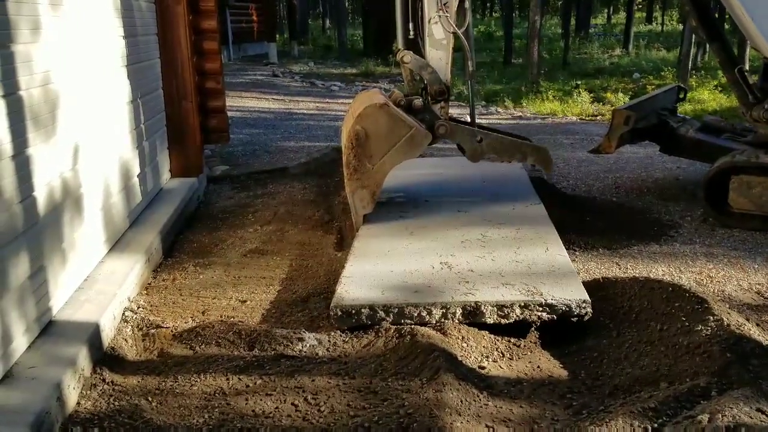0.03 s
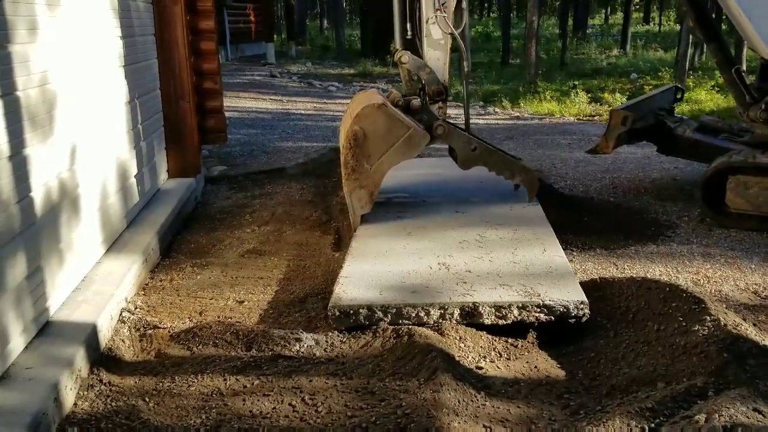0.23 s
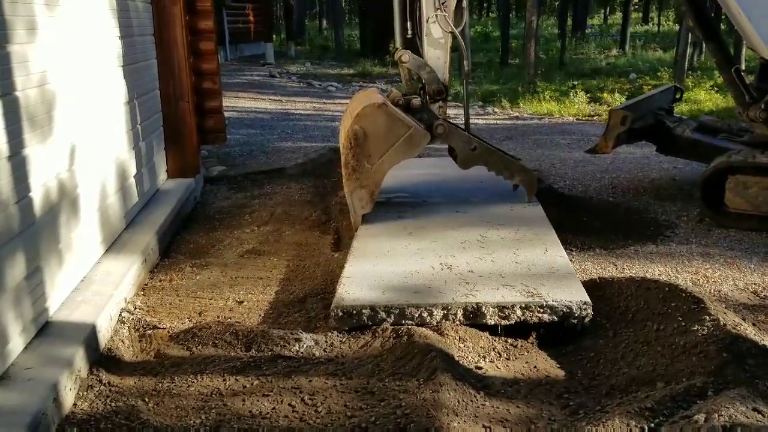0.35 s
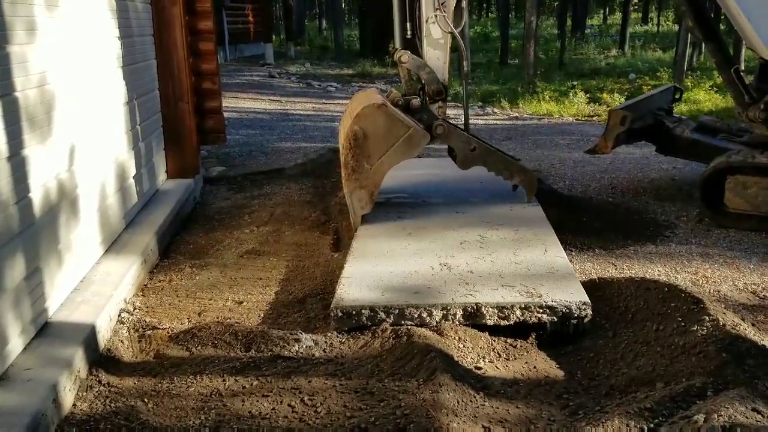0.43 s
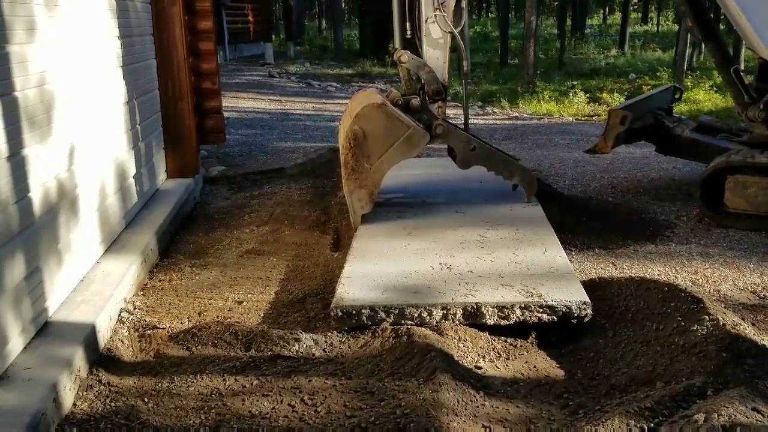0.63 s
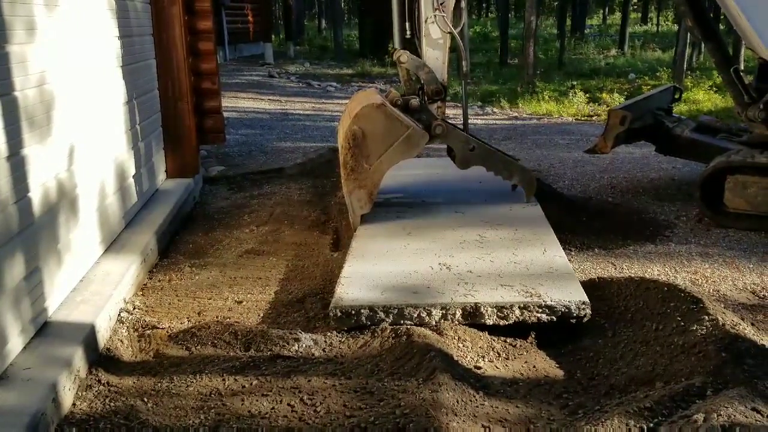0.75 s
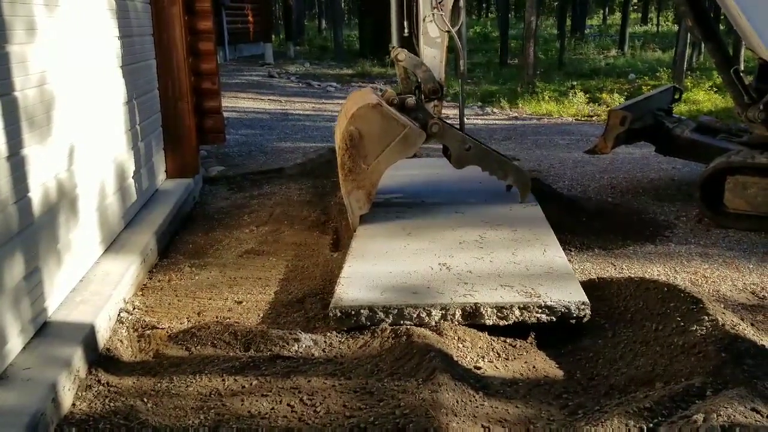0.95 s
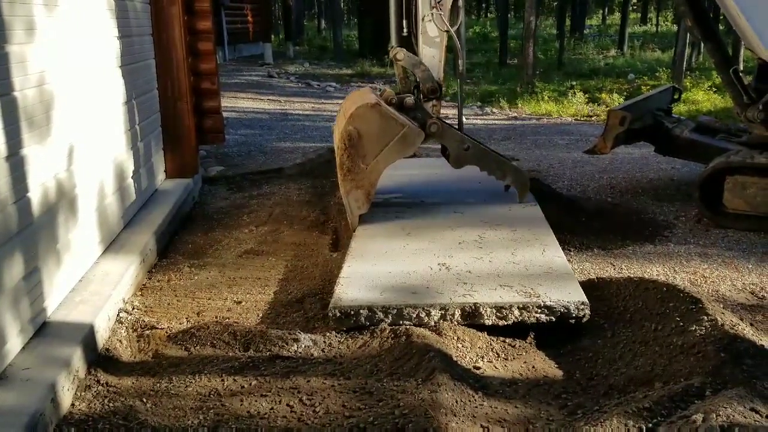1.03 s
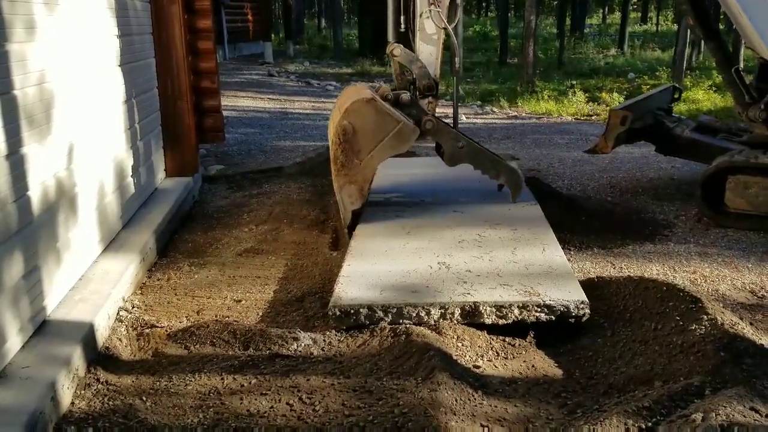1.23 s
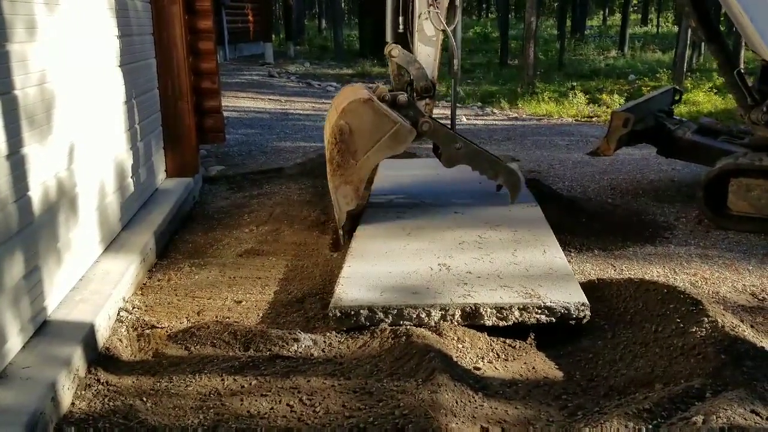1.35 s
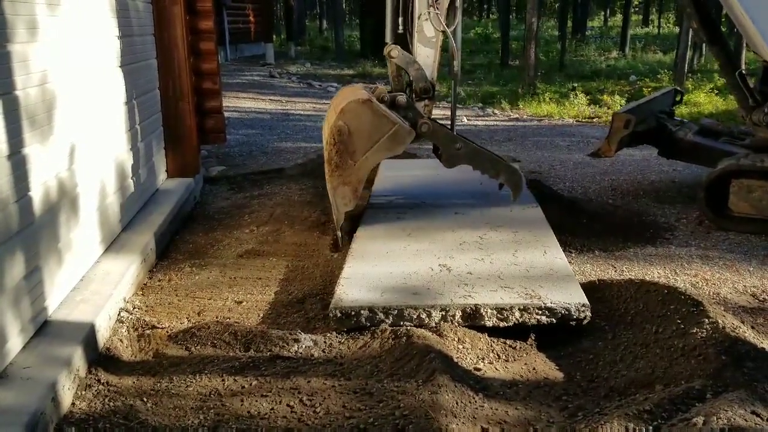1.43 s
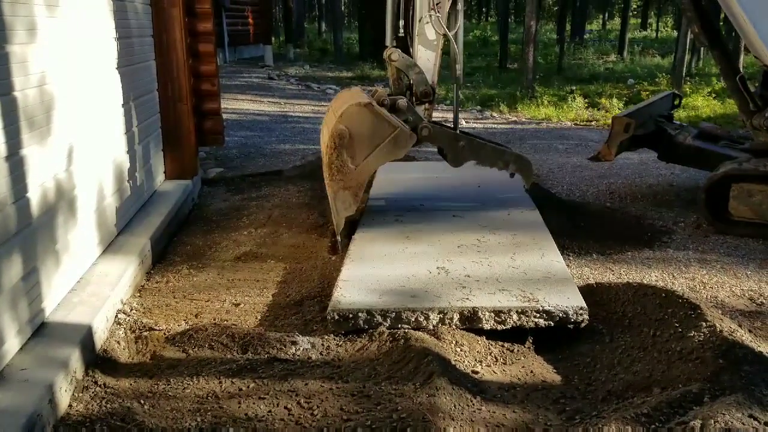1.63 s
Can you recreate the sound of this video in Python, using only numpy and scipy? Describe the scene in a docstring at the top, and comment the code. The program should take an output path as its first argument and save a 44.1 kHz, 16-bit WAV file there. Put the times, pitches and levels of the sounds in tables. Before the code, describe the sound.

One heavy, gritty thud sounds as a digger bucket strikes concrete in a yard. A brief hydraulic whine drops away and the diesel keeps rumbling under a small bright snap and a few light, hollow knocks and scrapes.

```python
"""Small excavator knocking concrete

Outdoors beside a wall, a diesel engine labours and its hydraulic pump whines until the steel
bucket hits a broken slab with a heavy thud. Then the engine runs free, a chip of concrete
snaps, and the bucket knocks and scrapes lightly along the slab's edge."""
import sys
import numpy as np
from scipy import signal
from scipy.fft import rfft, irfft
from scipy.io import wavfile

SR = 44100
rng = np.random.default_rng(int(sys.argv[2]) if len(sys.argv) > 2 else 0)


def master_out(mix):
    """Clip the mix to full scale and print it as 16-bit PCM to the path in sys.argv[1]."""
    frames = np.transpose(np.atleast_2d(mix))
    ceiling = np.clip(frames, -1, 1)
    pcm = np.round(ceiling * 32767).astype(np.int16)
    wavfile.write(sys.argv[1], SR, pcm)


N = 74970
TIME = np.arange(N) / SR

# Engine speed. Each row: time in seconds, crankshaft turns per second.
SPEED = [(0, 34.2), (.3, 34.0), (.45, 35.9), (.77, 36.5), (1.2, 35.8), (1.35, 36.1), (1.7, 34.9)]
# How hard the engine works. Each row: time in seconds, level change in dB.
EFFORT = [(0, 3), (.27, 4.5), (.5, 1), (.85, 0), (1.0, 2), (1.28, -0.5), (1.45, 2.5), (1.7, 5)]
# Engine and pump tones. Each row: cycles per crankshaft turn, level in dB.
DIESEL_TONES = [(2, -44.5), (4, -42), (5, -44), (6, -41.5), (7, -49.5), (9, -51.5)]
PUMP_TONES = [(9, -37), (18, -43)]

# The thud's blows. Each row: start in seconds, levels of slab, bucket, crunch and edge in dB,
# rise time in seconds.
BLOWS = [(0.2835, -7.5, -23.5, -19.5, -20.5, 0.0034), (.297, -6, -12, -24.5, -38, 0.0059),
         (.311, -8.5, -15.5, -18, -30.5, 0.0036), (.320, -40, -7, -31, -34, 0.0022),
         (.337, -19, -18, -30.5, -41, 0.0044), (.364, -35, -17, -44, -32.5, 0.0025),
         (.407, -36, -30, -37.5, -39, 0.0011)]
# Light knocks. Each row: start in seconds, levels of body, scrape and edge in dB,
# rise and fade times in seconds. A fade time is how long a sound takes to drop 60 dB.
KNOCKS = [(.968, -30.5, -42.5, -60, 0.029, 0.28), (1.035, -35, -35.5, -42, 0.017, 0.26),
          (1.219, -34, -39.5, -58, 0.019, 0.17), (1.3444, -23.5, -33, -35, 0.00073, 0.15),
          (1.396, -25, -31.5, -42, 0.0023, 0.13), (1.418, -29, -41, -39, 0.0022, 0.33),
          (1.441, -33, -33, -36.5, 0.0023, 0.19), (1.457, -30, -30, -23, 0.0058, 0.2),
          (1.546, -32, -26, -35, 0.0019, 0.12), (1.598, -32.5, -51, -56, 0.0036, 0.089),
          (1.676, -32.5, -39, -35, 0.0064, 0.14)]
# Snapping chips. Each row: start in seconds, level in dB.
CHIPS = [(0.8596, -33), (0.864, -32.5), (0.964, -47.5), (1.054, -40.5)]

# The tone colour of each noise. Each row: frequency in Hz, relative level in dB.
RUMBLE_NOISE = [(25, -28), (50, -12), (65, -36), (90, -6), (115, -15.5), (145, -2.5), (180, -1.5),
                (240, -4.5), (300, -9), (400, -12), (560, -16.5), (750, -13.5), (1000, -23), (1600, -34.5),
                (4000, -50.5)]
AIR_NOISE = [(500, -4), (1300, 5), (2000, 1), (3000, 1.5), (3700, -6.5), (5500, -8), (7400, -9.5),
             (8400, -23), (12000, -18.5), (15500, -27)]  # valve gear and fan air
OIL_NOISE = [(100, -4), (350, -54), (750, 6), (1100, -3), (2800, -12.5), (4500, -19.5), (7200, -13.5),
             (8500, -29), (15000, -29.5)]
CHIP_NOISE = [(1000, -12), (2600, -4), (4400, -4), (6300, -1.5), (8300, -9), (15500, -12.5)]
KNOCK_NOISE = [(100, -8), (350, -1), (520, -11.5), (720, -1), (920, -9.5), (1200, -11.5), (3000, -35),
               (8000, -54)]
SCRAPE_NOISE = [(400, -7), (1200, 1.5), (1800, -1), (2400, 3.5), (3400, -4.5), (6500, -13), (8700, -24),
                (15000, -31)]
THUD_NOISE = [(50, -25), (90, -5), (250, 2.5), (650, 0.5), (1000, -9), (1600, -13.5), (4000, -37.5)]
CRUNCH_NOISE = [(200, -22), (800, 4.5), (1900, -5), (3000, -2.5), (4500, -8.5), (7200, -13), (8700, -23),
                (15000, -29.5)]
CRACK_NOISE = [(900, -20), (1500, -18), (1800, 8), (2050, 5), (2400, -8), (2900, -19), (6000, -19),
               (12000, -37)]  # first bite of the steel edge

# The notes struck things ring with. Each row: pitch in Hz, relative level in dB, fade time in seconds.
CHIP_NOTES = [(2960, -18, .15), (3190, -4, 0.054), (4398, -3.5, 0.051), (4610, -10.5, 0.076),
              (6200, -2, 0.047), (6480, -11, 0.065), (9400, -16, .06), (11740, -14, .06), (11950, -14, .07),
              (13125, -9, 0.066)]
SLAB_NOTES = [(51.6, -14.5, 0.44), (98.3, -7, 0.31), (207.3, -11, 0.18), (252, 4, 0.15), (530, -4.5, 0.2),
              (549.2, -5.5, 0.16)]
BUCKET_NOTES = [(310.6, -5.5, 0.21), (369.2, -5, 0.27), (433, -1.5, 0.12), (645.6, 4.5, 0.12),
                (695, -5, 0.077), (743, -8, 0.15), (817.5, -9.5, 0.36), (886.6, -6, 0.2),
                (1084, -5.5, 0.13), (1129, -4, 0.092), (1302, -10, 0.08), (1531, -17.5, .15)]
EDGE_NOTES = [(1674, -3.5, 0.19), (1787, -1, 0.071), (1863, -3, 0.082), (1981, -6, 0.14), (2200, -5, 0.1),
              (2484, -8.5, .08), (2640, -9, 0.13)]  # steel cutting edge
HOLLOW_NOTES = [(721, 1, 0.14), (764, -3, .08)]  # air inside the bucket

# Stereo width. Each row: frequency in Hz, dB by which the ears' difference exceeds what they share.
ENGINE_WIDTH = [(60, -10), (150, -14), (380, -5.5), (950, 4), (2380, -1), (5980, 0.5), (15000, 1)]
HIT_WIDTH = [(60, -22), (250, -20), (550, -6), (750, -19.5), (1050, 3), (2000, -0.5), (12000, -1)]
# Where the hits sit. Each row: frequency in Hz, left level minus right level in dB.
HIT_PAN = [(500, 0.5), (1100, 0), (2300, -0.5), (4400, -4.5), (8000, -0.5), (13000, 4.5)]


def amp(db):
    """Turns decibels into a multiplier."""
    return 10 ** (np.asarray(db) / 20)


def unit(x):
    """Scales a signal to an average power of 1."""
    return x / np.sqrt(np.mean(x ** 2) + 1e-20)


def by_hz(points, hz):
    """Reads a table between its rows, spacing frequencies by octaves."""
    row_hz, value = np.transpose(points)
    return np.interp(np.log(hz + 1), np.log(row_hz + 1), value)


def by_time(points):
    """Reads a table at every sample."""
    return np.interp(TIME, *np.transpose(points))


def add(mix, start, sound):
    """Mixes in a stereo sound at a start time in seconds."""
    part = mix[:, round(start * SR):][:, :sound.shape[1]]
    part += sound[:, :part.shape[1]]


def drift(rate_hz):
    """A smooth random wander, mostly slower than the given rate."""
    hz = np.fft.rfftfreq(N, 1 / SR)
    return unit(irfft(rfft(rng.standard_normal(N)) / (1 + (hz / rate_hz) ** 4), N))


def coloured(noises, colour, width=HIT_WIDTH):
    """Gives two noises a tone colour and a stereo width; both ears share most of the bass."""
    hz = np.fft.rfftfreq(noises.shape[1], 1 / SR)
    angle = np.arctan(amp(by_hz(width, hz)))
    mid, side = rfft(noises) * np.array([np.cos(angle), np.sin(angle)]) * amp(by_hz(colour, hz))
    return unit(irfft(np.array([mid + side, mid - side]), noises.shape[1]))


def burst(colour, rise, fade, grit_db=0, size=22050):
    """Noise that swells and dies away; grit makes its level jump every 16 samples."""
    t = np.arange(size) / SR
    noise = rng.standard_normal((2, size))
    grains = np.repeat(amp(grit_db * rng.standard_normal(size)), 16)[:size]
    envelope = np.minimum(t / rise, 1) * amp(-60 * np.maximum(t - rise, 0) / fade)
    return coloured(noise * grains, colour) * envelope


def ring(notes, rise, phase_spread=np.pi, size=22050):
    """Fading notes, struck a little differently each time; high ones differ between the ears."""
    t = np.arange(size) / SR
    out = np.zeros((2, size))
    for (hz, db, fade), (extra_db, phase) in zip(notes, rng.standard_normal((len(notes), 2))):
        ear_phase = np.array([[1], [-1]]) * np.arctan(amp(by_hz(HIT_WIDTH, hz)))
        wave = np.sin(2 * np.pi * hz * t + phase_spread * phase + ear_phase)
        out += amp(db + extra_db - 60 * t / fade) * wave
    return out * np.minimum(t / rise, 1)


def shaft_tone(turns, per_turn, db):
    """A tone that follows the crankshaft and wavers a little in level."""
    level = np.sqrt(2) * amp(db + 1.3 * drift(rate_hz=5))
    return level * np.sin(2 * np.pi * (per_turn * turns + rng.random()))


def yard_echoes(sound, fade=0.33, size=22050):
    """Thin, scattered echoes from wall, machine and trees."""
    t = np.arange(size) / SR
    echoes = rng.standard_normal((2, size))
    echoes *= rng.random((2, size)) < 2000 / SR  # about 2000 a second
    echoes *= (t > .012) * amp(-60 * t / fade)
    tail = coloured(echoes, [(100, 1), (7000, 6.5), (15000, 0)]) / np.sqrt(size)
    return signal.fftconvolve(sound, tail, axes=1)[:, :N]


def engine(turns):
    """The diesel hums and its rumble pulses with each firing; valve gear and fan air hiss."""
    effort_db = by_time(EFFORT)
    firing = 1 + 0.26 * np.cos(2 * np.pi * 2 * turns)  # twice a turn
    rumble = amp(-34.5) * coloured(rng.standard_normal((2, N)) * firing, RUMBLE_NOISE, ENGINE_WIDTH)
    hiss_db = -45 + 0.71 * effort_db + 0.59 * drift(rate_hz=40)
    hiss = amp(hiss_db) * coloured(rng.standard_normal((2, N)), AIR_NOISE, ENGINE_WIDTH)
    hum = sum(shaft_tone(turns, per_turn, db) for per_turn, db in DIESEL_TONES)
    fan = shaft_tone(turns, per_turn=7.33, db=-37)
    return (rumble + hum + fan) * amp(effort_db) + hiss


def hydraulic_pump(turns, flutter_hz=16, release_s=0.36, release_length_s=0.15):
    """The pump's fluttering whine and the hiss of its oil stop as the load drops."""
    pump_turns = turns + .003 * drift(flutter_hz)
    whine = sum(shaft_tone(pump_turns, per_turn, db + 1.8 * drift(flutter_hz))
                for per_turn, db in PUMP_TONES)
    oil = amp(-38) * coloured(rng.standard_normal((2, N)), OIL_NOISE, ENGINE_WIDTH)
    load = np.clip(1 - (TIME - release_s) / release_length_s, 0, 1)
    return load * (whine + oil)


def chips(rise=0.00096):
    """Concrete breaks with bright, pinging snaps."""
    out = np.zeros((2, N))
    for start, db in CHIPS:
        snap = amp(-0.5) * burst(CHIP_NOISE, rise, fade=0.086, grit_db=-0.5)
        add(out, start, amp(db) * (snap + ring(CHIP_NOTES, rise)))
    return out


def knocks():
    """Steel touches concrete lightly: a hollow knock and a gritty scrape that rings the edge."""
    out = np.zeros((2, N))
    for start, body_db, scrape_db, edge_db, rise, fade in KNOCKS:
        hollow = amp(-6.5) * ring(HOLLOW_NOTES, rise + .003)
        body = burst(KNOCK_NOISE, rise, fade) + hollow + amp(-10) * ring(BUCKET_NOTES, rise)
        scrape = amp(scrape_db) * burst(SCRAPE_NOISE, rise, fade, grit_db=3.5)
        edge = amp(edge_db) * ring(EDGE_NOTES, rise)
        add(out, start, amp(body_db) * body + scrape + edge)
    return out


def thud(settle_s=.374, settle_db=-6):
    """The bucket cracks onto the slab and chatters, crushing grit; settling damps the ringing."""
    body, bite = np.zeros((2, 2, N))
    for start, slab_db, bucket_db, crunch_db, edge_db, rise in BLOWS:
        slab = amp(slab_db) * ring(SLAB_NOTES, rise, phase_spread=0.094)
        bucket = 0.64 * ring(BUCKET_NOTES, rise, phase_spread=0.98)
        thump = amp(-4.5) * burst(THUD_NOISE, rise, fade=0.14)
        add(body, start, slab + amp(bucket_db) * (bucket + thump))
        crunch = amp(crunch_db) * burst(CRUNCH_NOISE, rise, fade=0.13, grit_db=-0.5)
        clank = amp(edge_db) * ring(EDGE_NOTES, rise)
        add(bite, start + .002, crunch + clank)
    crack = amp(-14) * burst(CRACK_NOISE, rise=0.00087, fade=0.043, grit_db=-0.5)
    add(bite, BLOWS[0][0] + 0.0026, crack)  # just after the first blow starts
    settled = np.clip((TIME - settle_s) / 0.005, 0, 1)
    lean_right = amp([[-0.35], [0.35]])
    return body * amp(settle_db * settled) + bite * lean_right


def scene():
    """The engine and pump, with the hits a little to the right and their echoes."""
    pan_db = by_hz(HIT_PAN, np.fft.rfftfreq(N, 1 / SR)) * np.array([[.5], [-.5]])
    hits = irfft(rfft(thud() + knocks() + chips()) * amp(pan_db), N)
    turns = np.cumsum(by_time(SPEED)) / SR  # crankshaft turns so far
    return engine(turns) + hydraulic_pump(turns) + hits + amp(-15.5) * yard_echoes(hits)


def record(dry, low_cut_hz=53, high_cut_hz=15900):
    """The microphone drops the deepest bass, softens the loudest peaks and cuts the top treble."""
    trimmed = signal.sosfilt(signal.butter(2, low_cut_hz, "high", fs=SR, output="sos"), dry)
    softened = trimmed / (1 + (trimmed / .95) ** 6) ** (1 / 6)
    treble_cut = signal.firwin(511, high_cut_hz, window=("kaiser", 9), fs=SR)
    return signal.oaconvolve(softened, treble_cut[None], "same")


dry = scene()
out = record(dry)
master_out(out)
```